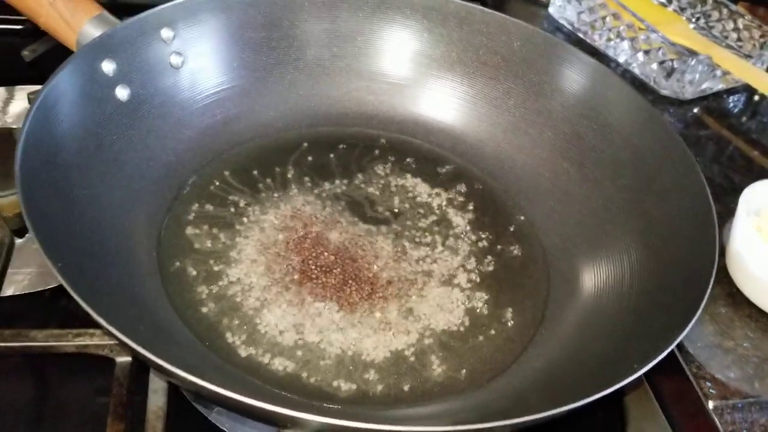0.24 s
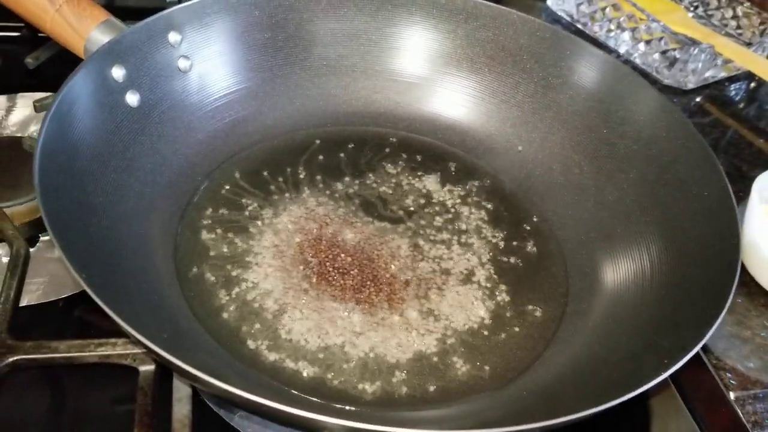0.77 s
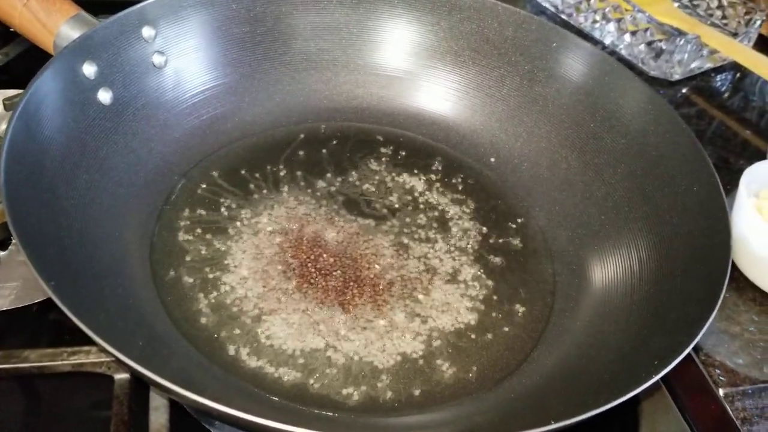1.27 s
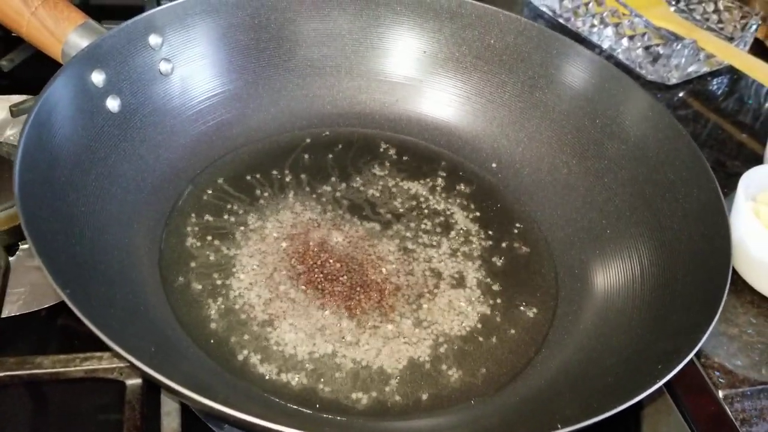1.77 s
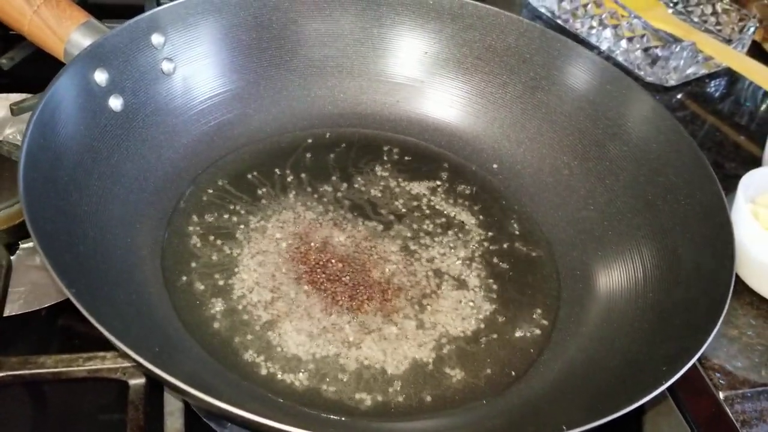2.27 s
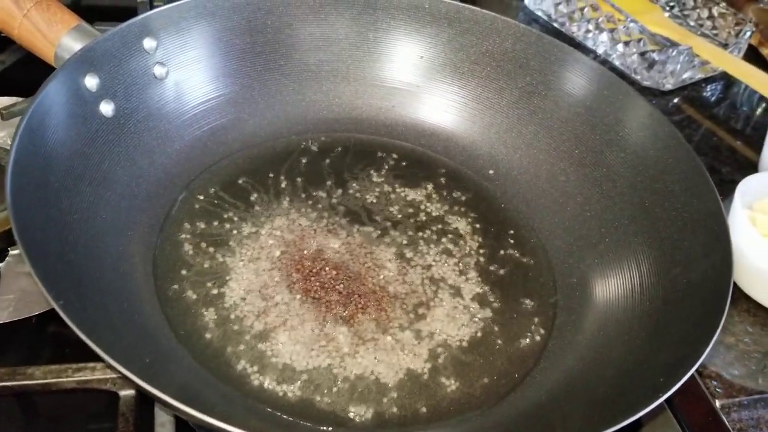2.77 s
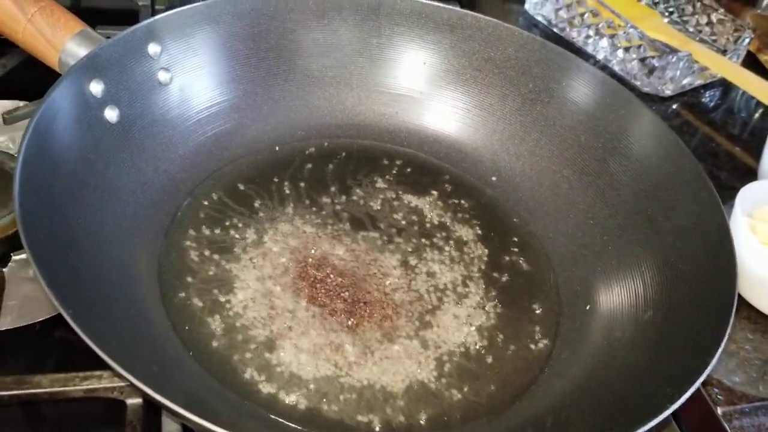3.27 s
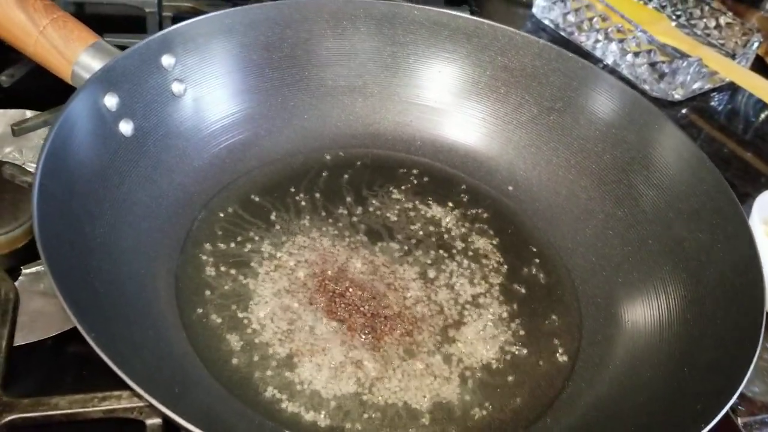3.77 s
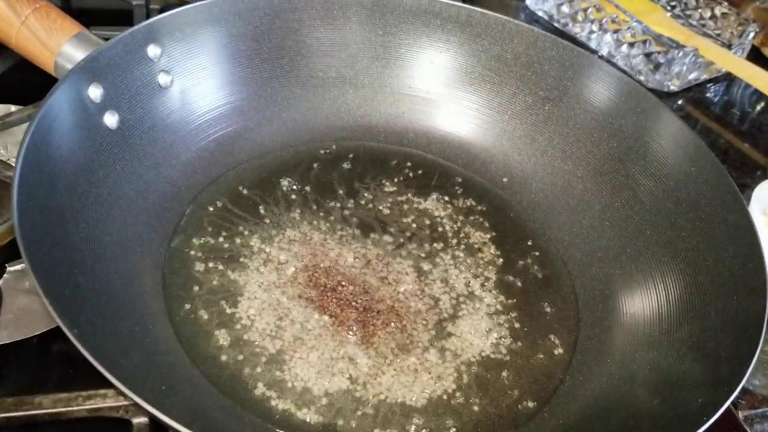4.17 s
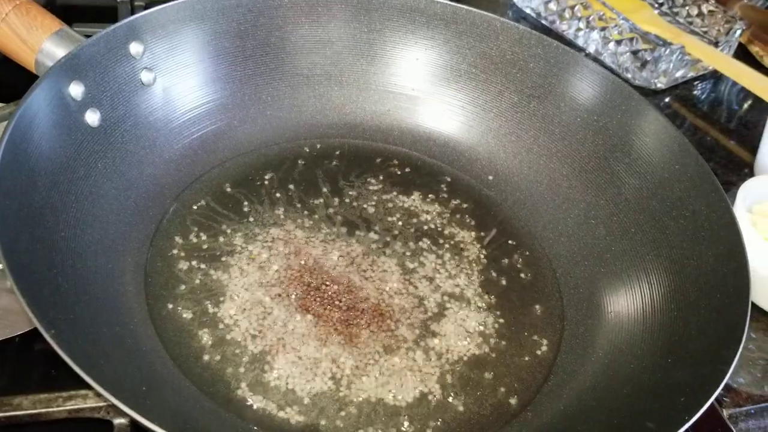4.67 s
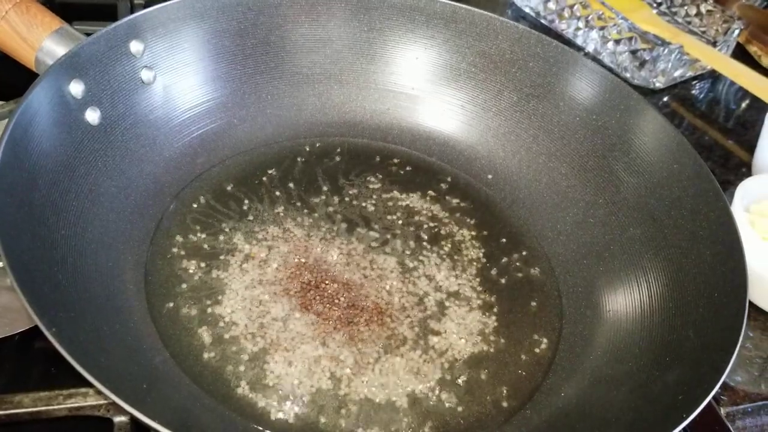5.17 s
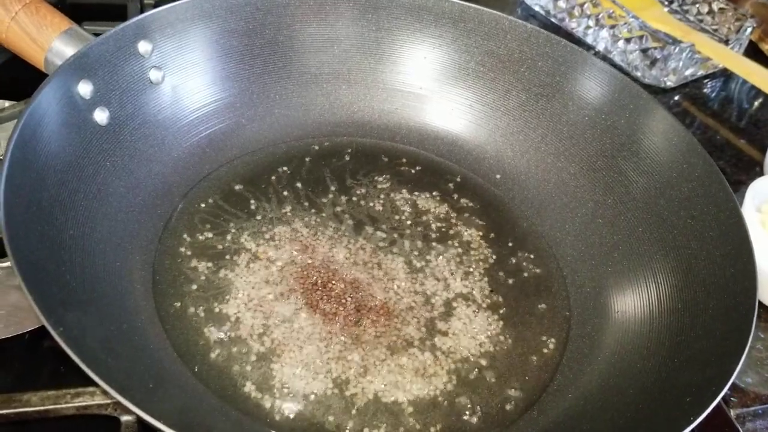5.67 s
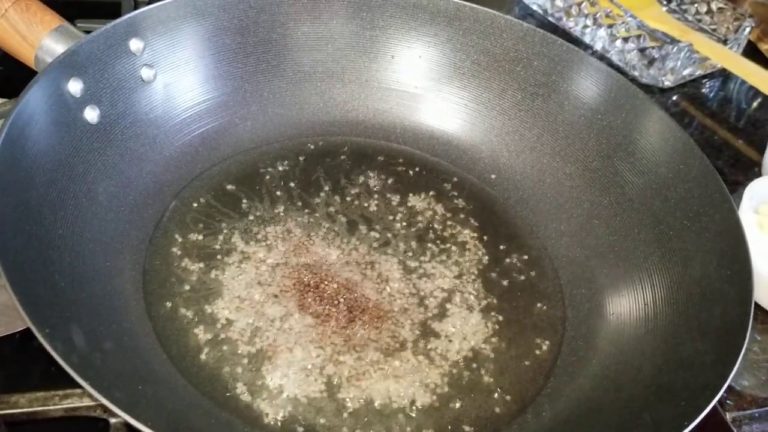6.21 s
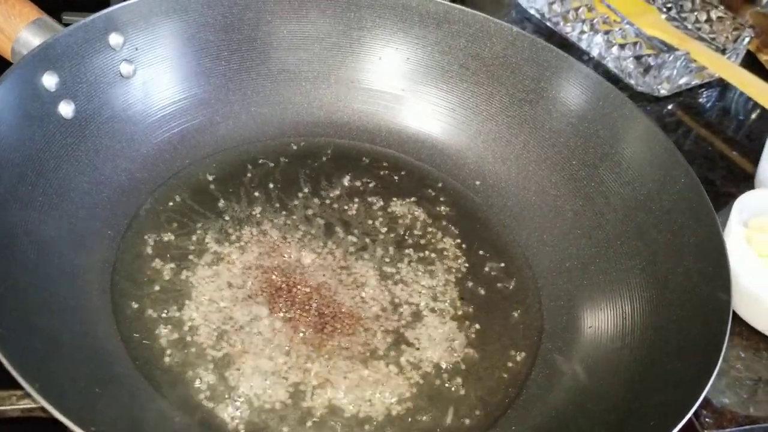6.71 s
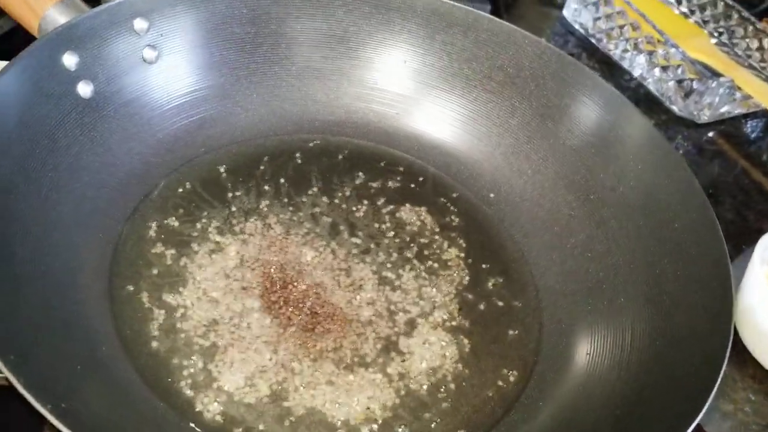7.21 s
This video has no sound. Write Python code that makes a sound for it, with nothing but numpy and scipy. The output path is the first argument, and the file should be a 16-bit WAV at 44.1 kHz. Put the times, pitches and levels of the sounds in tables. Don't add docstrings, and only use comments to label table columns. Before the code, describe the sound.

Mustard seeds crackle and pop sharply in sizzling hot oil in a steel wok, with a few blunt puffs bumping the close microphone.

```python
import sys
import numpy as np
from scipy import signal
from scipy.fft import rfft, irfft
from scipy.io import wavfile
from scipy.ndimage import uniform_filter1d

SR = 44100
rng = np.random.default_rng(int(sys.argv[2]) if len(sys.argv) > 2 else 0)


def transcribe(signal):
    frames = np.atleast_2d(signal).T
    limited = np.clip(frames, -1, 1)
    pcm = np.round(limited * 32767).astype(np.int16)
    wavfile.write(sys.argv[1], SR, pcm)


def gain_from_db(level_db):
    decades = np.asarray(level_db, float) / 20
    return 10 ** decades


N = 328545

# time in seconds, kitchen level in dB.
GAIN = [(0, -56.5), (.66, -57), (.76, -67.5), (1.39, -66.5), (1.68, -69), (2.14, -65), (2.78, -64.5),
        (3.1, -61), (3.5, -57), (4.0, -59), (4.4, -60.5), (5.19, -60), (5.66, -60.5), (5.75, -66),
        (6.31, -66), (6.81, -66.5), (7.45, -62.5)]
# start in seconds, pressure in dB, push +1 or pull -1, rise in ms, level dip
# in dB (sign ignored).
LEFT_PUFFS = [(0.7092, 13, 1, 0.12, 14), (0.9215, -18.5, -1, 0.022, 3), (1.2242, -14, 1, 0.43, 8),
              (1.97, -24.5, 1, 0.67, 4), (2.88, -15.5, -1, 0.14, 10), (3.8013, 12.5, -1, 21.5, 13),
              (4.0033, -6.5, 1, 1.7, 14), (4.195, -20, -1, 0.052, 5), (4.9735, 9.5, 1, 8.3, 9),
              (5.6679, 13, 1, 0.15, 18), (5.8345, -18, -1, 0.32, 13.5), (5.96, -16, -1, 13, -1),
              (6.0795, -0.5, -1, 4.9, 1), (6.239, -32, -1, 0.03, 1.5), (6.3525, -29, -1, 0.037, -4.5),
              (7.3746, -18.5, -1, 0.81, .5)]
# start in seconds, peak in dB, bubble ring in Hz,
# crack over ring in dB, echo under peak in dB.
LOUD_POPS = [(0.2578, -11, 3460, -3, -22), (1.2576, -11, 3770, -1, -24.5),
             (2.2239, -8.5, 3950, -2.5, -25.5), (2.2591, -11, 3900, 6.5, -27), (2.537, -9, 6050, -1, -27),
             (2.705, -10, 3950, 2.5, -26), (3.1446, -4.5, 3530, -0.5, -24.5),
             (3.315, -10, 3020, 1.5, -27.5), (3.5173, -4.5, 4500, 8, -28.5),
             (3.6492, -5.5, 3530, 1.5, -22.5), (3.9228, -14.5, 3280, -9, -11.5),
             (3.943, -2.5, 4500, 3, -26.5), (4.1946, -7.5, 6800, 0, -24), (4.6298, -7.5, 3800, -1, -24),
             (4.65, -8, 3600, -0.5, -24), (4.699, -11, 3980, -9, -25.5), (4.7651, -9, 4040, 2, -27.5),
             (5.1105, -3, 8960, -3.5, -27.5), (5.4823, -13, 3860, -15, -25),
             (5.5011, -9.5, 3150, -1.5, -27), (5.798, -8, 4340, -1.5, -24.5), (6.069, -10, 3430, -2, -19.5),
             (6.3533, -11.5, 3500, 5.5, -27), (6.635, -9, 3800, 3.5, -27.5)]
# start in seconds, peak in dB, bubble ring in Hz,
# crack over ring in dB, echo under peak in dB.
LOUD_CRACKS = [(0.533, -2.5, 6200, 5.1, -25), (1.15, -12.5, 3540, 13.6, -27),
               (1.2243, -16.5, 7500, 4.9, -17.5), (1.6263, -9, 8300, 9.4, -27.5),
               (1.97, -5.5, 5500, 3.5, -28), (2.8263, -11.5, 2640, 4.8, -24.5),
               (2.88, -11.5, 3750, 11, -20.5), (2.91, -6, 4120, 7.5, -27), (3.7827, -11, 7200, 19, -30),
               (3.8017, -10.5, 6240, 2.5, -13.5), (3.8797, -10.5, 3000, 3.8, -28),
               (4.049, -10, 7940, 2.8, -13), (4.235, -8.5, 7060, 19, -22), (4.974, -14, 6300, 5.6, -16.5),
               (5.052, -10.5, 7860, 3.3, -15), (5.2304, -11.5, 3380, 8.1, -32),
               (5.2578, -7.5, 7200, 3.4, -18), (5.8352, -4.5, 7600, 12, -20.5), (5.9335, -5, 4070, 12, -29),
               (5.99, -13, 6000, 18, -22), (6.081, -12.5, 3510, 39, -20.5), (6.595, -6.5, 2700, 13, -32),
               (7.1619, -11, 4100, 14, -31), (7.3725, -10, 6300, 3.6, -21.5)]
# start in seconds, peak in dB, note in Hz.
BUBBLES = [(1.342, -30, 2670), (2.375, -40.5, 2580), (2.3805, -43.5, 2920), (2.434, -35.5, 3270),
           (2.825, -35, 2580), (2.91, -26.5, 2920), (2.554, -28, 2770), (3.027, -33.5, 3390),
           (3.487, -30, 3600), (3.6, -24.5, 3000), (4.3157, -27, 2663), (4.396, -56, 2700),
           (4.822, -40, 3000), (5.0216, -44, 3440), (5.329, -34, 2835), (5.417, -39.5, 2400),
           (6.15, -27, 2600), (6.733, -43, 3100), (7.315, -37, 2130)]


def evened(x):
    return x / np.sqrt(np.mean(x ** 2, -1, keepdims=True) + 1e-20)


def read(points, hz):
    f, value = np.transpose(points)
    return np.interp(np.log(hz + 1), np.log(f + 1), value)


def curve(points, s):
    return np.interp(s, *np.transpose(points))


def coloured(x, db_of):
    size = x.shape[-1]
    return irfft(rfft(x) * gain_from_db(db_of(np.fft.rfftfreq(size, 1 / SR))), size)


def add(mix, s, sound):
    part = mix[..., round(s * SR):][..., :sound.shape[-1]]
    part += sound[..., :part.shape[-1]]


def bed(*curves):
    return gain_from_db(sum(curve(points, np.arange(N) / SR) for points in curves))


def level_dips_db():
    dip = np.zeros(N)
    u = np.arange(-600, 2400) / SR
    shape = np.where(u < 0, np.clip(1 + u / 0.0076, 0, 1), np.exp(-u / 0.0078))
    causes = [(row[0], abs(row[-1])) for row in LEFT_PUFFS]
    causes += [(row[0], np.clip(row[-1] + 25, 0, 11)) for row in LOUD_POPS + LOUD_CRACKS]
    for s, dip_db in causes:
        at = (round((s + u[0]) * SR) + np.arange(len(u))) % N
        dip[at] = np.minimum(dip[at], -dip_db * shape)
    return dip


def kitchen():
    # frequency in Hz, density in dB per Hz.
    rumble_spectrum = [(18, -44), (30, -14), (66, 4), (188, -7), (228, 1.5), (287, -6.5), (349, -6),
                       (600, -12), (1500, -25.5), (1950, -43), (3300, -120)]
    # frequency in Hz, level in dB over the kitchen.
    hum_lines = [(59, 3), (122, -6), (162, -7.5), (216, -13.5), (237.5, -8.5), (327, -11.5), (356.5, -4),
                 (416, -8.5)]
    t = np.arange(N) / SR
    rumble = rng.standard_normal(N) + 0.22 * rng.standard_normal((2, N))
    out = gain_from_db(-0.5) * evened(coloured(rumble, lambda f: read(rumble_spectrum, f)))
    for hz, db in hum_lines:
        level_waver, phase_waver = evened(uniform_filter1d(rng.standard_normal((2, N)), 4000))
        out += gain_from_db(db + 1 + 0.8 * level_waver) * np.sin(2 * np.pi * hz * t + 0.15 * phase_waver)
    return bed(GAIN) * out


def fizz():
    # frequency in Hz, density in dB per Hz.
    fizz_spectrum = [(530, 2), (900, -8.5), (1960, -9.5), (3230, -2.5), (4600, -1.5), (9200, 11),
                     (12800, 11.5), (15700, 12), (16500, -51)]
    # time in seconds, level in dB over the kitchen.
    heat = [
        (0, 10),
        (3.5, 11),
        (5.75, 13.5),
        (6.799, 12),
        (7.45, 10),
    ]
    ticks_per_s = 160
    strikes = gain_from_db(3.5 * np.minimum(rng.exponential(1, N), 1.8)) * (rng.random(N) < ticks_per_s / SR)
    n = np.arange(1500)
    tick = rng.standard_normal(1500) * (np.exp(-n / 0.82) + 0.0099 * np.exp(-n / 170.0))
    ticks = evened(signal.oaconvolve(strikes, tick)[:N])
    swell = gain_from_db(0.68 * evened(uniform_filter1d(rng.standard_normal(N), 2500)))
    hiss = rng.standard_normal((2, N)) * swell + gain_from_db(-15) * ticks
    port_gain = gain_from_db([[3.5], [2]])
    return bed(GAIN, heat) * port_gain * evened(coloured(hiss, lambda f: read(fizz_spectrum, f)))


def burst(hz, cycles, crack_db, tilt_db, chance):
    # frequency in Hz, level in dB.
    snap_spectrum = [(300, -11), (1000, -10.5), (1900, -37), (2700, 4), (5000, 12), (7500, 20), (9500, -2)]
    # frequency in Hz, level in dB.
    crack_spectrum = [(2500, -58), (6000, -9), (10500, 1.5), (13000, 5), (15800, 0.5), (17000, -30)]
    t = np.arange(chance.shape[-1]) / SR
    ring = np.sin(2 * np.pi * hz * t * (1 + 6 * t)) * np.exp(-t * hz / cycles)
    jolt = (t == 8 / SR) + 0.25 * chance * np.exp(-t / 0.0003)
    snap = coloured(jolt, lambda f: read(snap_spectrum, f))
    rough_jolt = jolt + 0.15 * chance * np.exp(-t / 0.0006)
    crack = coloured(rough_jolt, lambda f: read(crack_spectrum, f)
                     + tilt_db * np.clip((f - 12500) / 3500, -1, 1))
    share = np.clip(cycles / 2.5, 0.22, 0.97)
    body = np.sqrt(share) * evened(ring) - np.sqrt(1 - share) * evened(snap)
    sound = body * np.clip(t / 0.00018, 0, 1)
    sound = sound + gain_from_db(crack_db - 1) * evened(crack) * np.clip(t / 0.00006, 0, 1)
    sound = sound * (t < 0.02)
    return sound / abs(signal.hilbert(sound.mean(0))).max()


def echo(sound, chance):
    # frequency in Hz, level in dB.
    returned = [(400, -9.5), (1500, -5), (2100, -6), (2700, -2.5), (4500, -3), (7000, -2.5), (9500, -4.5),
                (14000, -6)]
    size = chance.shape[-1]
    t = np.arange(size) / SR
    patches_db = 2.8 * evened(uniform_filter1d(chance[2], 90))[:size // 2 + 1]
    decay = gain_from_db(-60 * t / 0.11) + gain_from_db(-10 - 60 * t / 0.39)
    swarm = chance[:2] * decay * np.clip(t / 0.00053, 0, 1)
    colour = np.sqrt((abs(rfft(sound, size)) ** 2).mean(0)) ** 0.63
    walls = gain_from_db(read(returned, np.fft.rfftfreq(size, 1 / SR)) + patches_db)
    wet = irfft(rfft(swarm) * walls * colour, size)
    return wet / np.linalg.norm(wet[0]) * np.linalg.norm(swarm[0])


def seed_rows():
    # start in seconds, peak in dB, bubble ring in Hz, echo under peak in dB.
    dull = [(0.635, -15.5, 5900, -15), (0.8194, -18.5, 3000, -22.5), (0.8567, -12.5, 3680, -27),
            (1.3421, -16, 2800, -25), (1.7892, -20, 3500, -23.5), (2.296, -15.5, 5630, -28),
            (2.4346, -22, 3220, -26), (2.5529, -15, 3000, -26), (2.9016, -12.5, 3100, -24),
            (2.914, -17, 3140, -30), (3.47, -17, 6100, -28), (3.4862, -16, 3430, -25.5),
            (3.602, -14, 3260, -28), (4.098, -14.5, 3460, -20.5), (4.103, -14.5, 3300, -20.5),
            (4.3153, -24, 4160, -14), (4.818, -27, 3200, -8.5), (4.8405, -17.5, 3090, -24),
            (5.086, -18.5, 2400, -17), (5.6154, -12.5, 2780, -24.5), (5.8166, -13.5, 3020, -38),
            (5.9769, -15.5, 3220, -25), (6.149, -16.5, 2450, -20), (6.155, -11, 4160, -29),
            (6.2019, -21.5, 5700, -19.5), (6.5698, -15, 2960, -24), (6.5773, -17.5, 3220, -29),
            (6.7802, -12.5, 4070, -25), (6.924, -19, 3200, -23.5), (7.0946, -16, 3100, -25)]
    # start in seconds, peak in dB, bubble ring in Hz,
    # crack over ring in dB, echo under peak in dB.
    bright = [(0.0612, -12.5, 3460, 3.5, -22.5), (0.1938, -11.5, 4870, 0.5, -18.5),
              (0.4704, -12.5, 7800, -2, -26), (0.528, -18, 8270, 1, -26), (0.539, -23.5, 7670, -14, -9.5),
              (0.629, -13, 3450, 5.5, -19), (0.679, -9, 4540, 9, -18), (0.923, -14.5, 3760, 1, -26),
              (1.4258, -19, 4200, 0, -23), (3.6591, -15, 4470, -3, -15), (3.722, -17, 8010, 4, -30),
              (3.9295, -12, 3010, 13, -38), (4.0034, -9.5, 9220, 3, -16.5), (4.008, -19, 3150, 11, -7.5),
              (4.2382, -10.5, 7050, -2.5, -24.5), (4.284, -19, 8870, 5, -45),
              (4.6121, -15.5, 3530, 5.5, -26), (4.9406, -14, 8010, 32, -40), (5.264, -27, 3620, -3, -24),
              (5.3282, -17.5, 2830, 0, -20.5), (5.372, -17, 6630, -6.5, -26), (5.47, -10.5, 8500, 11, -25),
              (5.5237, -13, 4040, 3, -25), (5.5494, -8.5, 9220, 10, -34), (5.6433, -16.5, 8530, 14, -22),
              (5.6875, -9.5, 3760, 6, -26.5), (5.921, -22.5, 7320, 6, -23), (6.1847, -13, 4240, 0.5, -26),
              (6.2394, -13, 7300, -3.5, -30), (6.877, -18, 7550, 6, -29)]
    # start in seconds, peak in dB, bubble ring in Hz.
    faint_dull = [(0.069, -17, 3200), (0.1357, -23, 3000), (0.446, -21, 4200), (0.692, -31, 4400),
                  (0.891, -20.5, 3640), (1.4339, -30, 3500), (1.845, -25.5, 6800), (2.0093, -24.5, 3620),
                  (2.073, -26.5, 3400), (2.978, -21.5, 3820), (3.027, -27, 3450), (3.307, -21.5, 3900),
                  (4.479, -26, 3600), (4.5308, -26, 5150), (5.2768, -24, 3270), (5.402, -20.5, 7500),
                  (5.5087, -31, 3000), (5.5971, -23, 2960), (5.959, -19.5, 3250), (5.9679, -20.5, 4000),
                  (6.589, -20, 2820), (6.6385, -24, 3150), (6.7976, -19.5, 6140), (7.055, -22, 3300),
                  (7.083, -19, 7500), (7.3165, -24, 2480), (7.3589, -22.5, 2950)]
    # start in seconds, peak in dB, bubble ring in Hz,
    # crack over ring in dB.
    faint_mixed = [(0.164, -37, 3880, -8), (0.1927, -13.5, 3790, -25), (0.3784, -20, 4270, 4.5),
                   (0.4106, -28.5, 3760, -10), (0.508, -23, 3850, 7), (0.5522, -11, 3360, 9),
                   (0.841, -36, 3300, -59), (1.4783, -27, 6600, -3), (1.6557, -38, 3860, -7),
                   (1.8811, -28.5, 7000, -25), (2.412, -25, 8400, 3), (2.574, -24, 4020, -8),
                   (2.5855, -27, 7320, -6), (2.7286, -23.5, 3790, -10), (2.7464, -32, 3100, -9),
                   (3.0226, -25, 3480, 7), (3.13, -29, 3100, -3), (3.4773, -20, 6240, 13),
                   (3.5602, -27.5, 4740, -9), (3.815, -18, 3450, -15), (3.9087, -23, 7490, -2),
                   (4.5443, -32, 2800, -9), (4.9, -22, 3050, 9), (4.935, -28.5, 3360, -1),
                   (5.0216, -27, 3500, -13), (5.1825, -26, 4050, -2), (5.581, -29, 3790, -12),
                   (5.7488, -31, 4130, -15), (6.0398, -23, 3030, 3), (6.2855, -30.5, 3700, -9),
                   (6.313, -32, 3620, -18), (6.3321, -49, 3400, -1), (6.3735, -31, 3190, -7),
                   (6.411, -29.5, 4350, 1), (6.4426, -32.5, 3270, -27), (6.493, -36, 2760, -3),
                   (6.5396, -33, 7000, -5), (6.7347, -30.5, 3060, -17), (7.2002, -35, 3530, 0),
                   (7.369, -14, 3270, -3), (7.433, -31, 2800, -6),
                   (0.955, -26, 8180, 5), (1.004, -40, 7750, 3), (1.018, -38, 8070, 20),
                    (5.668, -13, 9000, 25), (1.553, -38, 4740, -25), (1.5674, -33.5, 7490, 0),
                    (2.3802, -30, 4600, 0), (1.8351, -33, 8270, -3), (1.9465, -29, 7320, 15),
                    (1.9526, -36, 9220, 11), (1.9925, -28, 7060, 12), (2.0141, -21, 6200, 12),
                    (2.425, -29, 9220, 23), (2.814, -27, 8270, 3), (2.8671, -28, 8790, 9),
                    (3.0609, -30, 7410, 13), (3.348, -35, 2670, 7), (3.641, -37, 3270, 12),
                    (3.7405, -32, 4570, 13), (3.7752, -31, 7490, 13), (3.8272, -25, 3100, 11),
                    (3.9795, -25, 3790, 7), (4.3819, -33, 4130, 21), (4.5197, -26, 7060, 12),
                    (4.5517, -25, 8870, -1), (4.5974, -27, 8010, 13), (4.943, -17, 7600, -2),
                    (4.9604, -24, 6000, 5), (4.996, -21, 7150, 12), (5.4584, -31, 6630, 7),
                    (5.5086, -15, 7410, 4), (5.564, -23, 3960, 40), (5.7736, -32, 8010, 1),
                    (6.504, -22.5, 9200, 12), (6.7266, -30, 7240, 1), (6.7693, -36, 9220, 4),
                    (6.939, -24.5, 7700, 5), (6.9725, -32, 7670, 13), (6.9934, -36, 8350, 8),
                    (7.0126, -22, 8440, 10), (7.151, -21, 8440, 5), (7.2708, -37, 4910, 13)]
    rows = LOUD_POPS + LOUD_CRACKS + bright
    rows = rows + [(s, db, hz, -3.5, echo_db) for s, db, hz, echo_db in dull]
    rows = [(*row, 1.33 * gain_from_db(-0.3 * np.clip(row[3], -12, 6))) for row in rows]
    # crack over ring dB, echo under peak dB, cycles
    rows += [(*row, -5, -20.5, 1.88) for row in faint_dull]
    rows += [(*row, -23, 1.88) for row in faint_mixed]
    rows += [(*row, -22, -13, 9) for row in BUBBLES]
    return rows


def seeds():
    # time in seconds, left over right in dB.
    aim = [
        (0, 0.5),
        (1.7, 0.5),
        (3.3, 0),
        (3.65, 4),
        (4.4, 3.5),
        (5.3, 2),
        (7.45, 3),
    ]
    # start in seconds, left over right in dB,
    # crack tilt towards the top in dB.
    spots = [(0.533, -1, 1), (0.629, 1, -1), (0.8912, -2, -3), (1.2245, -5, 2), (1.4256, 1, -1),
             (1.626, -3, -9), (1.845, -8, 5), (1.97, 3, -1.5), (2.2589, 0, 1), (2.537, 1, -3),
             (2.705, -3, -0.5), (2.88, 3, 7), (2.91, 3, -5), (3.1446, 0, -4), (3.6495, 2, -1),
             (3.722, 11, 0), (3.7829, 12, 5), (3.8014, 6, 4), (3.9225, 1, 2), (3.9293, 9, -3),
             (3.943, 9, -3), (4.1946, 4, 16), (4.284, 10, -2), (4.7651, 2, -7.5), (4.9406, 10, 6),
             (4.9738, 5, 14), (4.9955, 6, -2), (5.053, 7, 6), (5.086, 1, -10), (5.1104, 7, -3),
             (5.47, 7, 8), (5.5494, 7, -3.5), (5.6678, 2, 11), (5.8353, 6.5, 1.5), (5.921, 9, 3),
             (5.99, 9, 6), (6.149, 0, -8), (6.1846, 0, -11), (6.2395, 6, 11), (6.595, 3, -8),
             (6.877, -1, 1), (7.0126, 9, 13)]
    bright_left, scatter_db = 0.15, 2.2
    port_lag_s = 0.00002
    out, dip = np.zeros((2, N)), level_dips_db()
    for s, peak_db, hz, crack_db, echo_db, cycles in seed_rows():
        size = 5120 if cycles == 1.88 else 12288
        chance = rng.standard_normal((5, size))
        pan_db = curve(aim, s) + bright_left * max(crack_db, 0) + scatter_db * chance[4, -1]
        tilt_db = 0
        spot = min(spots, key=lambda row: abs(row[0] - s))
        if abs(spot[0] - s) < 0.0025:
            pan_db, tilt_db = spot[1:]
        clumps = gain_from_db(1.78 * evened(uniform_filter1d(chance[3], 40)))
        grain = 0.5 * chance[4, :1024] + chance[2:4, -1024:]
        sound = burst(hz, cycles, crack_db, tilt_db, grain)
        sound[1] = np.roll(sound[1], round(port_lag_s * SR * chance[4, -2]))
        level_db = peak_db - dip[round(s * SR)]
        add(out, s - 0.0004, gain_from_db(level_db + pan_db * np.array([[0.5], [-0.5]])) * sound)
        echo_gain = gain_from_db(peak_db + echo_db + np.array([[1.2], [-1.2]]))
        add(out, s + 0.0004, echo_gain * echo(sound, chance * clumps))
    return out


def puffs():
    # start in seconds, pressure in dB, push +1 or pull -1, rise in ms.
    right_puffs = [
        (0.7093, 1.5, 1, 2.5),
        (5.0526, -15, -1, 5),
        (5.8364, -9, -1, 14),
        (7.3704, -27, -1, 1.5),
    ]
    # upper limit in Hz at the left port, then the right.
    top_hz = (4900, 3000)
    low_cut = np.r_[signal.butter(4, 56, "high", fs=SR, output="sos"),
                    signal.butter(2, 12, "high", fs=SR, output="sos")]
    out, t = np.zeros((2, N)), np.arange(6000) / SR
    for port, table in enumerate((LEFT_PUFFS, right_puffs)):
        blunt = signal.butter(1, top_hz[port], fs=SR)
        for s, db, push, rise_ms, *_ in table:
            jump = 1 / (1 + rise_ms)
            pressure = 1 - (1 - jump) * np.exp(-t * 1000 / max(rise_ms, 0.03))
            swing = signal.lfilter(*blunt, signal.sosfilt(low_cut, pressure))
            add(out[port], s, np.sign(push) * gain_from_db(db) * swing)
    return out


def singing():
    slide, slide_s = 0.061, 0.01
    sing_db, t60_s = -5.5, 0.078
    out, t = np.zeros((2, N)), np.arange(SR // 4) / SR
    for s, db, hz in BUBBLES:
        noise = rng.standard_normal((2, 2, len(t)))
        a, b = evened(uniform_filter1d(uniform_filter1d(noise, 90), 90))
        phase = 2 * np.pi * hz * (t + slide * slide_s * (np.exp(-t / slide_s) - 1))
        note = (0.75 + 0.35 * a) * np.sin(phase) + 0.4 * b * np.cos(phase)
        add(out, s, gain_from_db(db + sing_db - 60 * t / t60_s) * np.clip(t / 0.006, 0, 1) * note)
    return out


def scene():
    return kitchen() + fizz() + seeds() + puffs() + singing()


def top_cut(x):
    return signal.sosfilt(signal.butter(12, 16970, fs=SR, output="sos"), x)


def record(dry):
    # frequency in Hz, level in dB.
    port_dip = [(7800, 0), (9300, -3), (10600, 0)]
    limited = np.clip(dry * gain_from_db(level_dips_db()), -0.9, 0.9)
    finished = coloured(limited, lambda f: read(port_dip, f)
                        + np.interp(f, [15750, 16050, 17000], [0, -22, -38]))
    return top_cut(finished)


dry = scene()
out = record(dry)
transcribe(out)
```